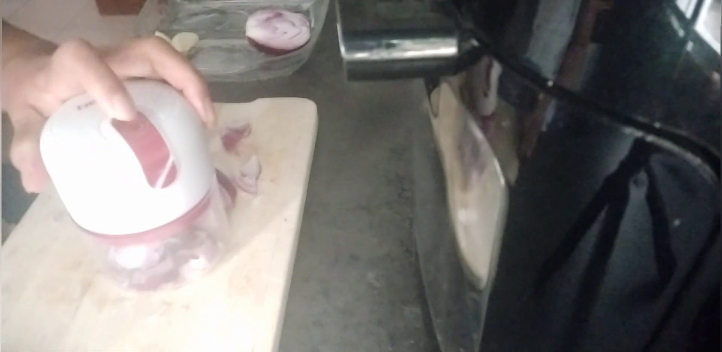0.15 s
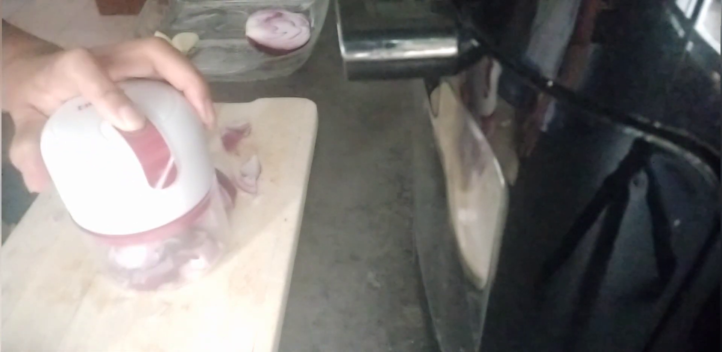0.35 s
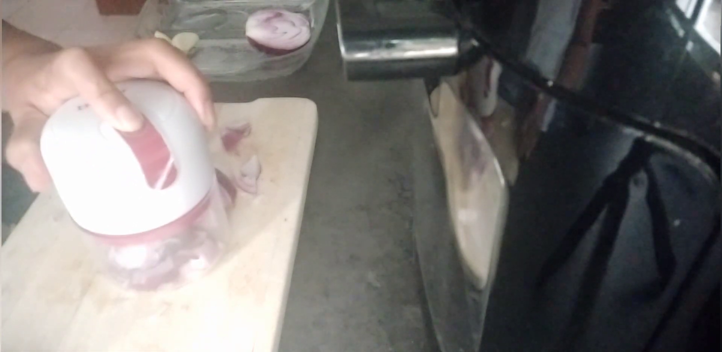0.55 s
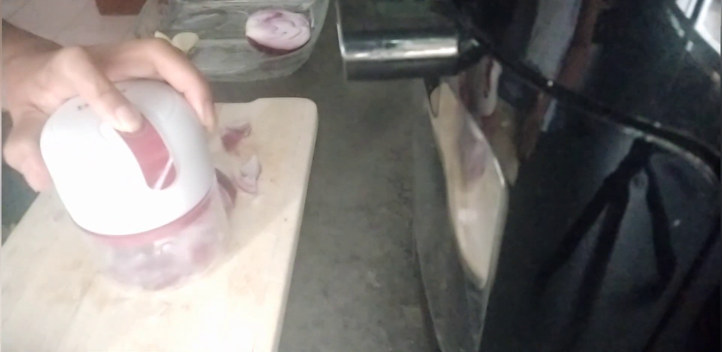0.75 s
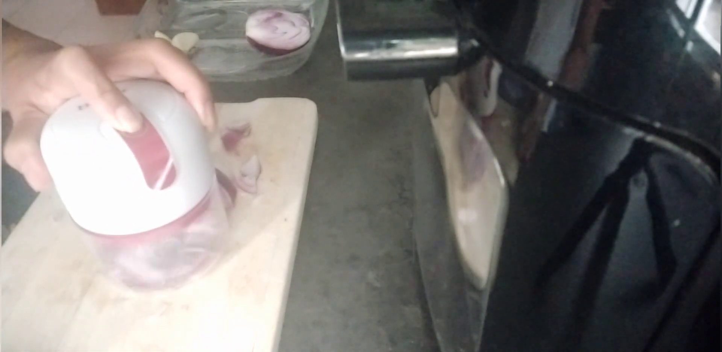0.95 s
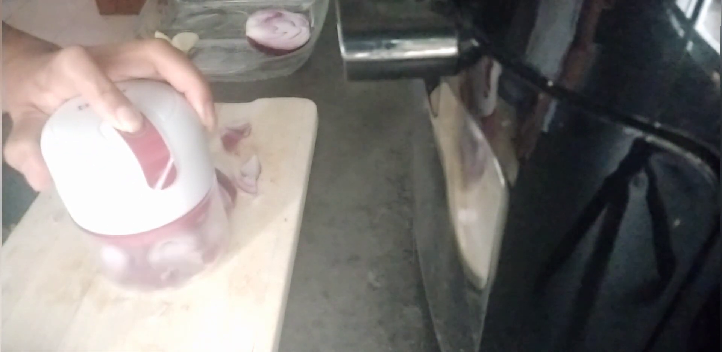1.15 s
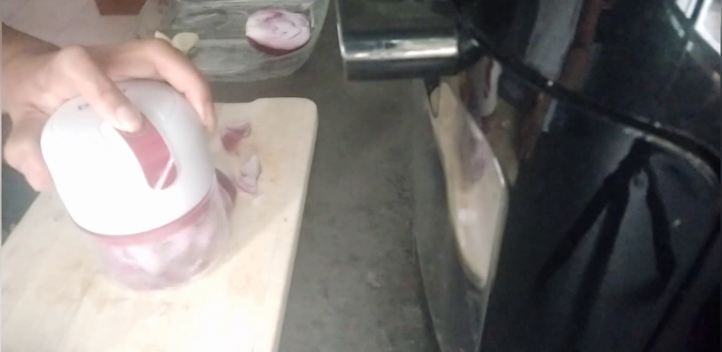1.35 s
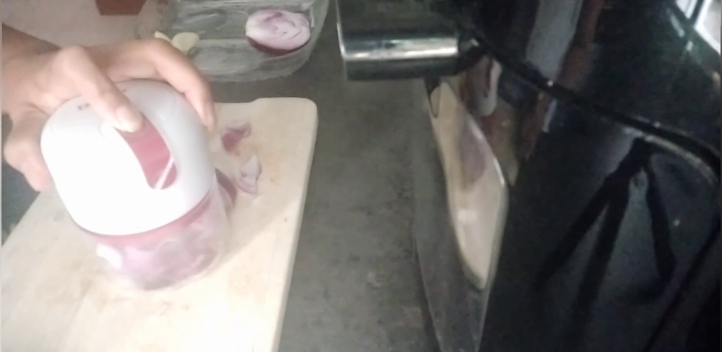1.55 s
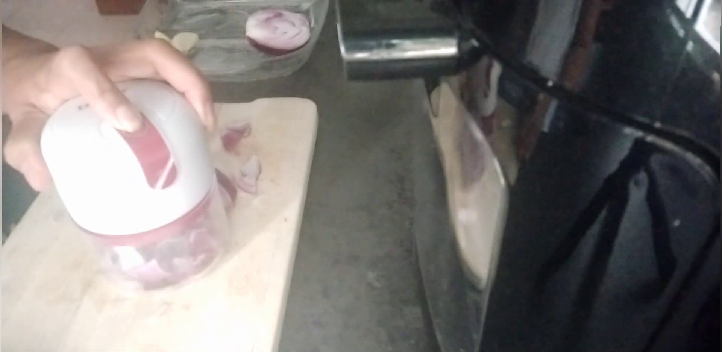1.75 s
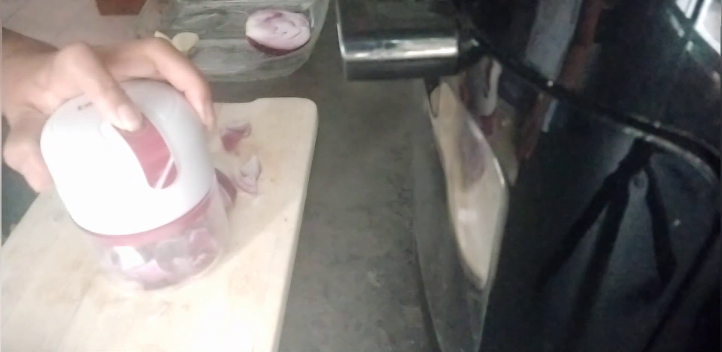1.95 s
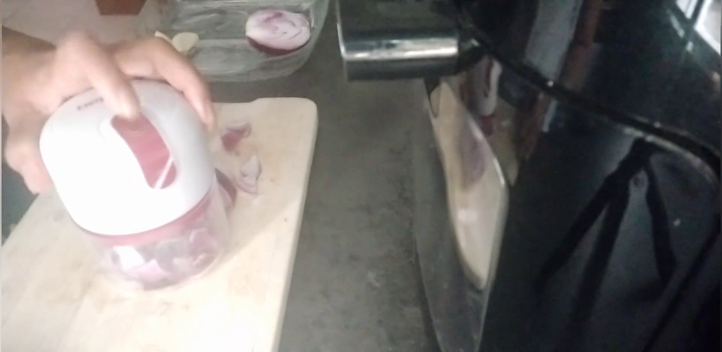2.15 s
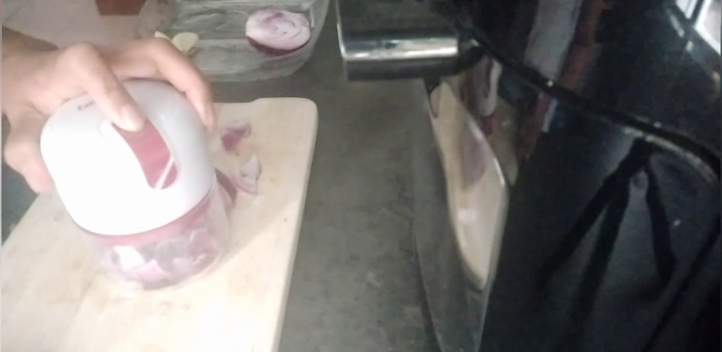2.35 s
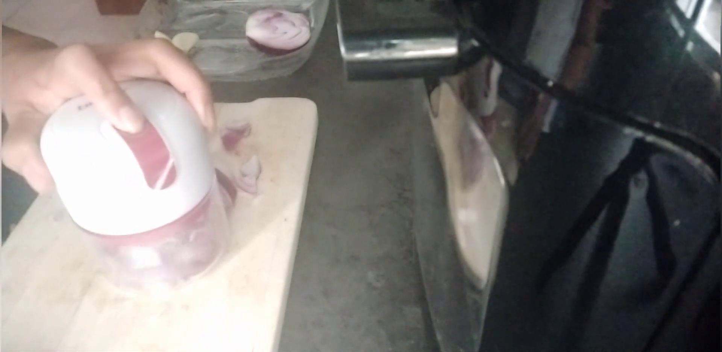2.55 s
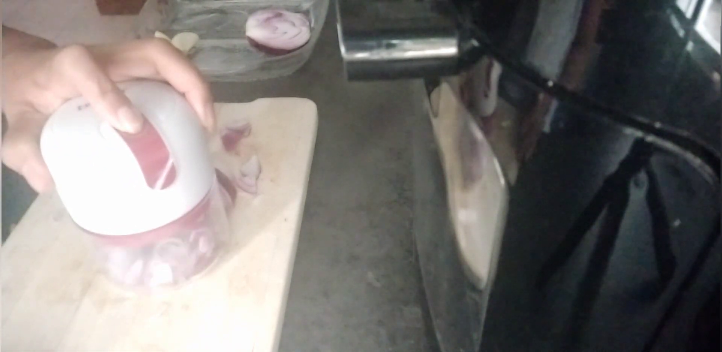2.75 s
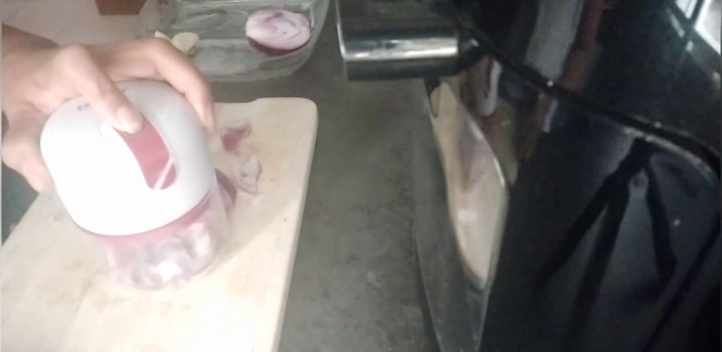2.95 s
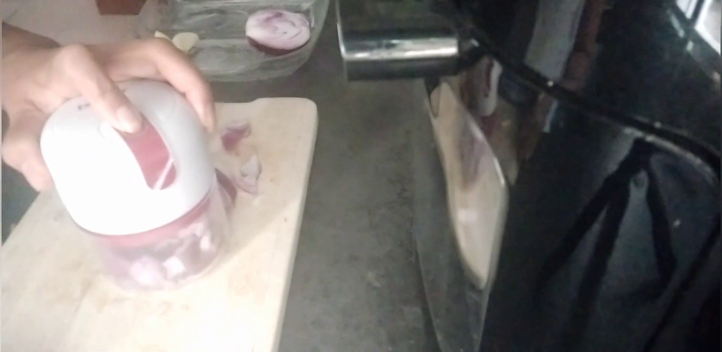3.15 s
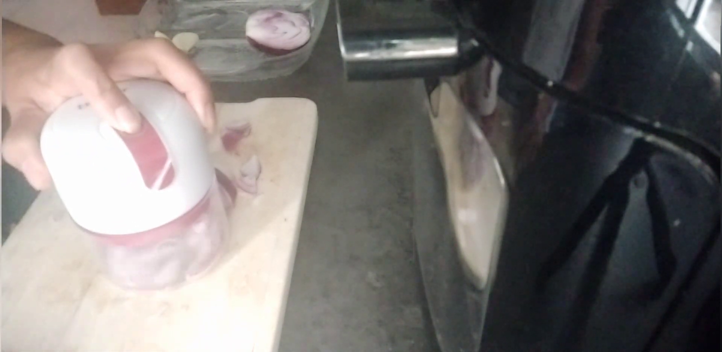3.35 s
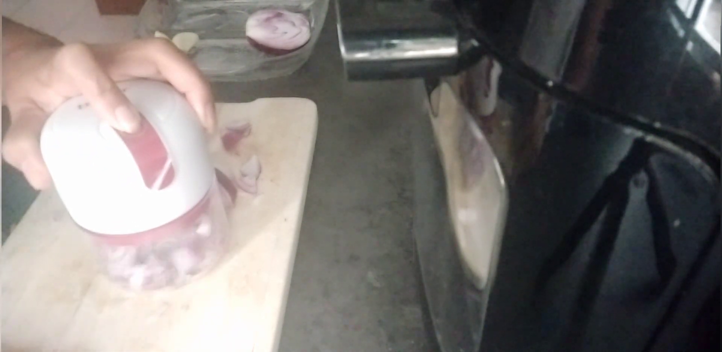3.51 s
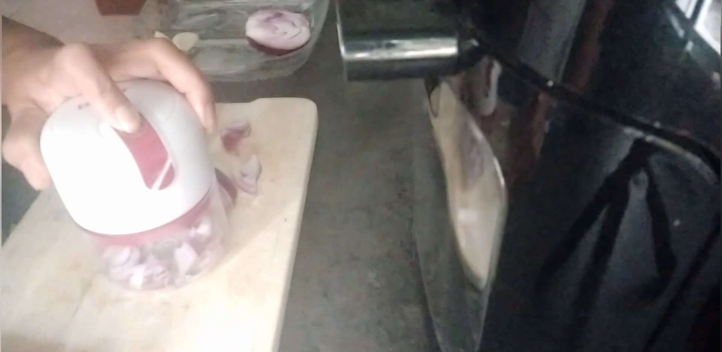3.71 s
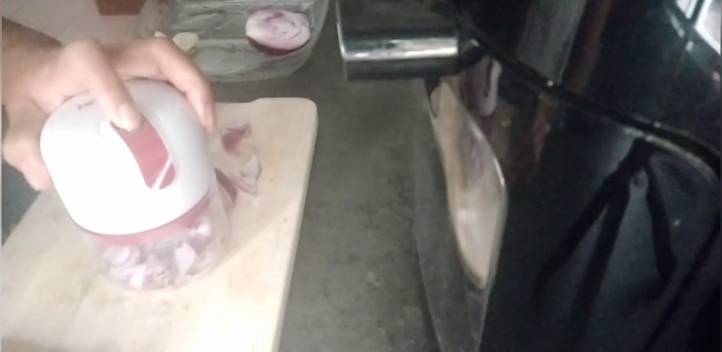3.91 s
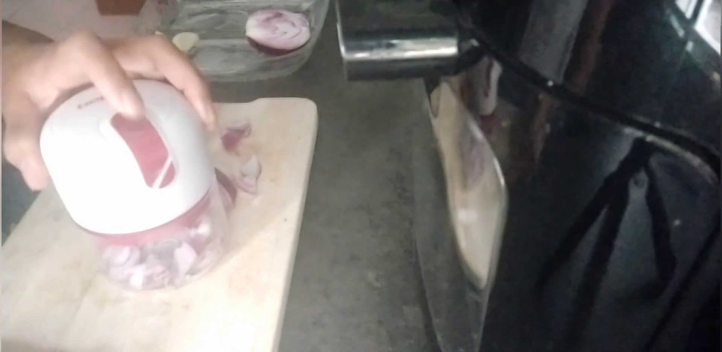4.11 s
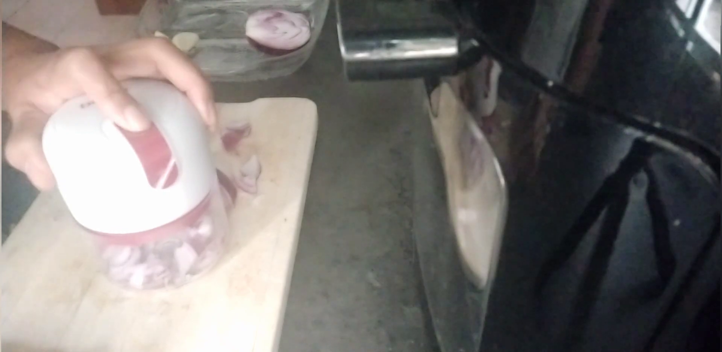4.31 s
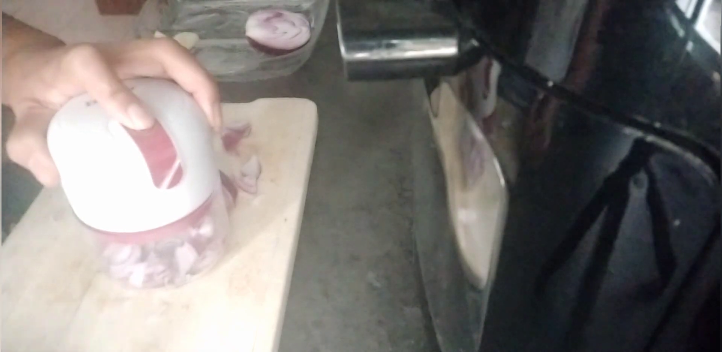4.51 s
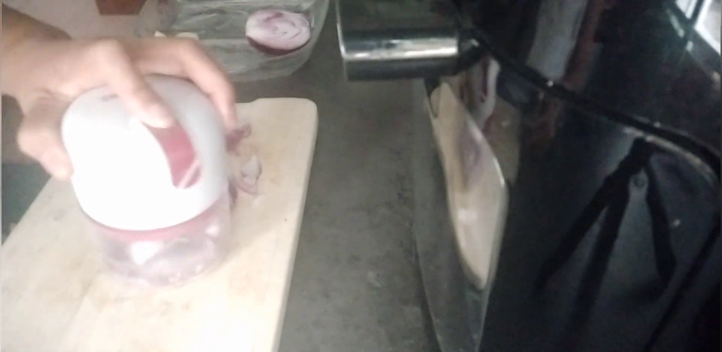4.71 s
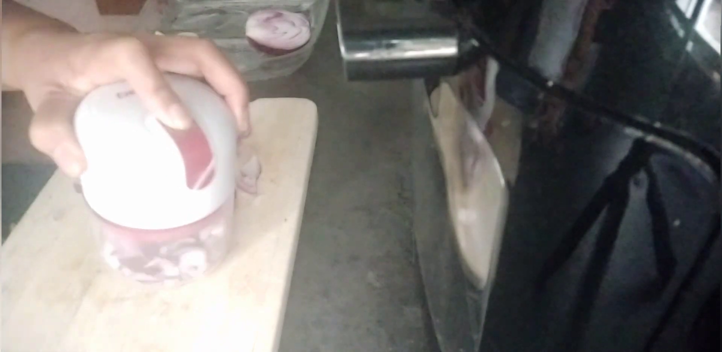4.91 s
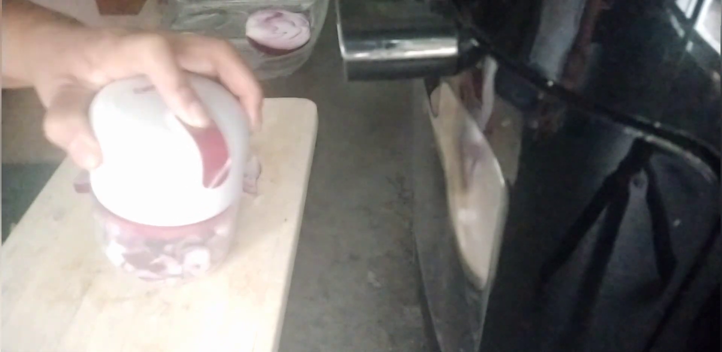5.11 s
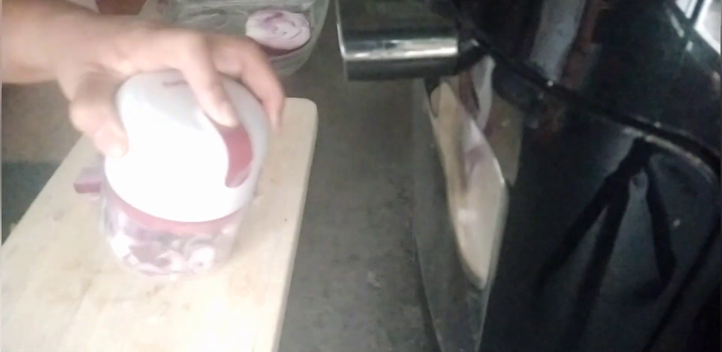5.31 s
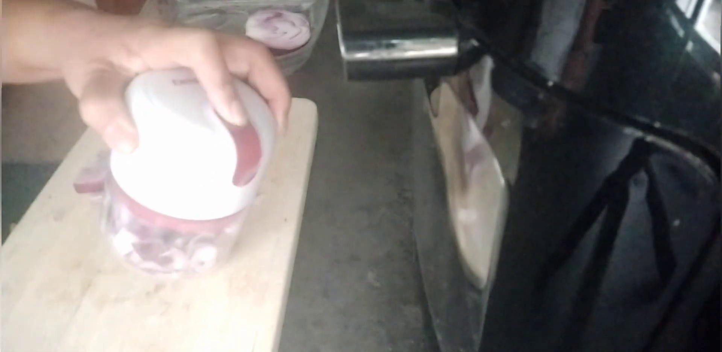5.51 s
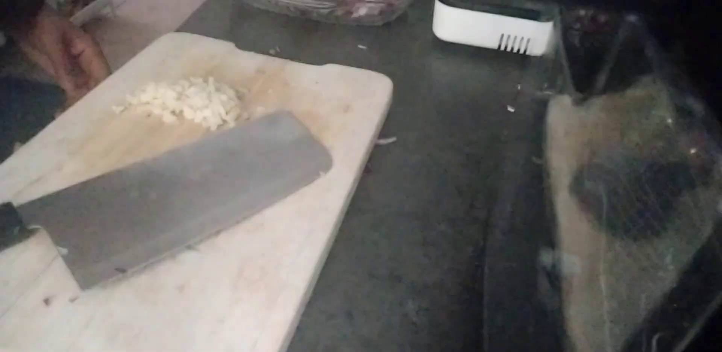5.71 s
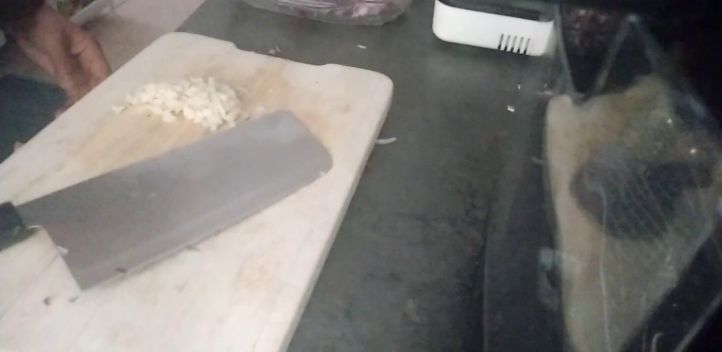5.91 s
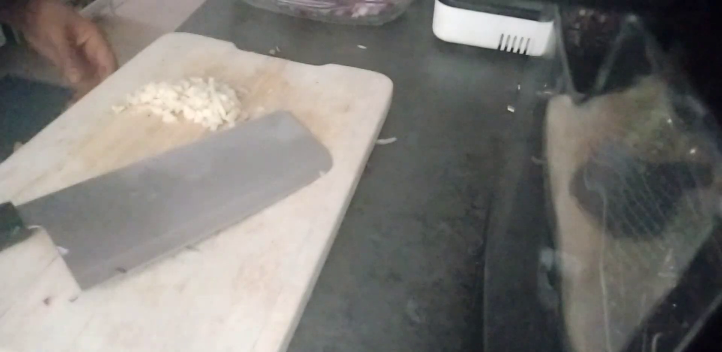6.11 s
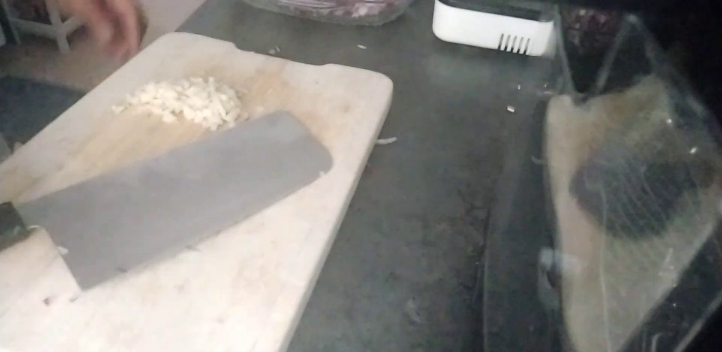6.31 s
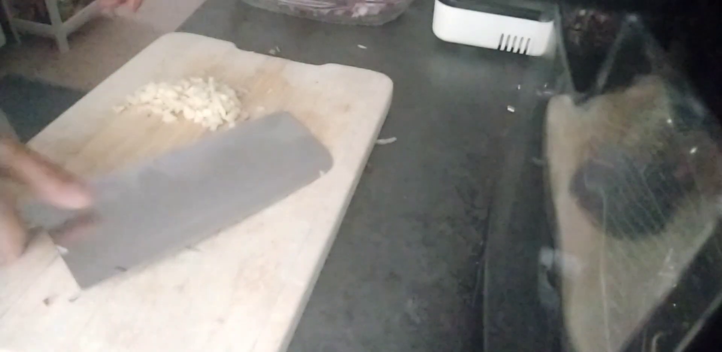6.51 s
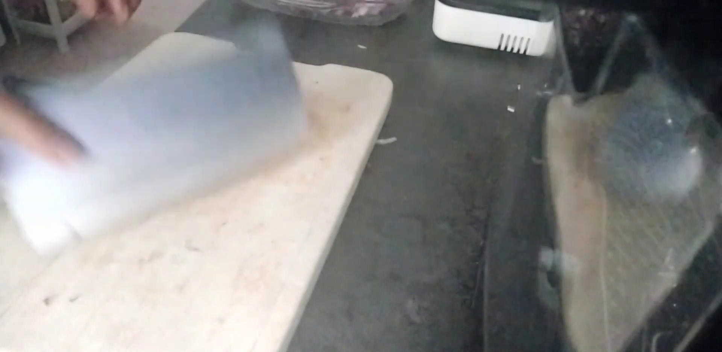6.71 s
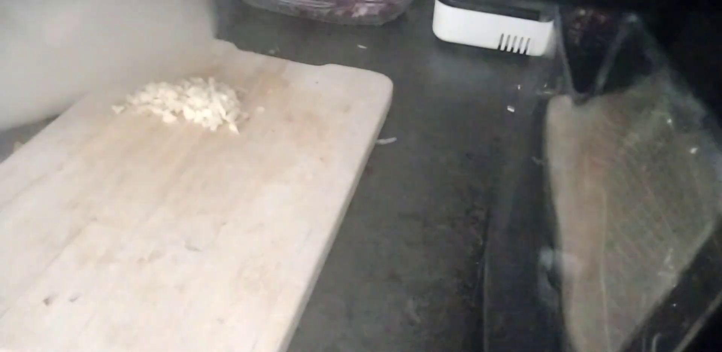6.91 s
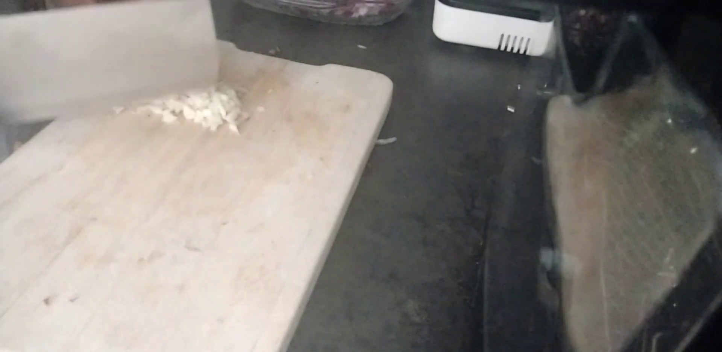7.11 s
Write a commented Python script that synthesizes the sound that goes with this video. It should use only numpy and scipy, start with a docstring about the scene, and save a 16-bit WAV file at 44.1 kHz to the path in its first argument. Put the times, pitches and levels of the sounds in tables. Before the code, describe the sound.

A small electric chopper crunches onion in three pulsing bursts on a wooden board, then after a brief dropout a steel cleaver scrapes and lifts away.

```python
"""A small chopper is pressed in three bursts on a wooden board in a kitchen: its blade sweeps through onion
about seven times a second, as dense noise grains ringing bowl resonances, with squeals, cracks and board shake.
Button and lid tick as struck modes and filtered clicks. After a short silence the sound fades in again and a
steel cleaver is lifted off the board: filtered noise and one ring. A sine hum and shaped noise fill the room."""
import sys
import numpy as np
from scipy import signal
from scipy.fft import rfft, irfft, next_fast_len
from scipy.io import wavfile

SR = 44100
rng = np.random.default_rng(int(sys.argv[2]) if len(sys.argv) > 2 else 0)


def undo_db(level):
    """Turn decibels back into plain size, where 20 dB means ten times bigger."""
    steps = np.asarray(level, float) / 20
    return 10 ** steps


def generate_wav(signal):
    """Clip the signal to [-1, 1] and save it as 16-bit WAV at the path in sys.argv[1]."""
    frames = np.transpose(np.atleast_2d(signal))
    scaled = np.clip(frames, -1, 1) * 32767
    pcm = np.round(scaled).astype(np.int16)
    wavfile.write(sys.argv[1], SR, pcm)


N = 315659

# room spectrum: hz, density_db
AIR_SPECTRUM = [(15, -54), (25, -6.5), (53, -14.5), (64, -15.5), (87, -7.5), (145, -25), (195, -13.5),
                (270, -13.5), (405, -1.5), (451, -10), (607, -18.5), (988, -33), (6210, -40), (9320, -39),
                (16000, -47.5)]
# broad humps in the room noise: hz, width_hz, relative_db
ROOM_HUMPS = [(75, 59, -5), (120.3, 6.8, -2.5), (185, 16, -10), (408.8, 8.8, -1.5), (636, 30, -19)]
# room levels: time_s, rumble_db, drone_db, hiss_db
ROOM_LEVELS = [(0, -52, -59.5, -57.5), (.5, -54.5, -62, -59), (2.3, -56, -65.5, -62.5),
               (4.0, -57, -68, -63), (4.5, -51.5, -55.5, -58), (5.3, -55.5, -64.5, -62),
               (5.69, -56.5, -63.5, -61), (6.1, -56.5, -66, -63), (7.16, -56, -64, -62.5)]
# steady sine: hz, rms_db
SINE_HUM = (81, -64)
# left-right correlation of noise: hz, correlation
CORRELATION = [(25, 1), (100, 0.96), (250, 0.83), (600, 0.32), (1500, 0.17), (16000, 0.046)]
# faint narrow hums and rustles: start_s, length_s, centre_hz, width_hz, level_db
FAINT_BANDS = [(0.0, .56, 605, 59.7, -68.5), (2.04, .13, 2000, 530, -71.5), (5.566, 0.2, 2130, 700, -71),
               (6.16, 0.03, 2960, 150, -75), (6.472, 0.044, 2600, 150, -72), (6.544, 0.054, 1800, 120, -69)]
# button and lid ticks: start_s, level_db, centre_hz
BUTTON_TICKS = [(0.577, -31.5, 2020), (1.93, -45, 1400), (2.444, -39, 1640), (3.916, -46.5, 1730),
                (4.189, -46, 1170), (4.279, -40.5, 1130), (4.586, -30.5, 2150), (5.121, -33, 1890)]
# lid modes: hz, relative_db, t60_s
LID_MODES = [(1222, -32.5, 0.013), (1700, -4.5, 0.032), (1942, 2.5, 0.087), (2260, 11, 0.01),
             (2600, -15.5, .025), (2680, -4, 0.028), (3140, -8.5, 0.073), (3950, -32, 0.045)]
# button presses: start_s, end_s, shake_start_db, shake_end_db, crunch_treble_db
BUTTON_PRESSES = [(0.634, 1.722, -51, -47, 1), (2.516, 3.59, -50.5, -53.5, 0.65),
                  (4.68, 4.94, -48, -51, -2)]
# knocks on the board: start_s, level_db, contact_s
BOARD_KNOCKS = [(.72, -35, 0.0038), (1.14, -41.5, 0.0032), (1.41, -36, 0.0041), (1.555, -37.5, .005),
                (2.99, -39, 0.0062), (3.135, -39.5, 0.0037), (4.187, -48, 0.0034), (4.286, -31, 0.0047),
                (4.865, -37.5, 0.009), (6.507, -41, 0.0012), (6.522, -36.5, 0.002), (6.545, -42.5, 0.0019),
                (6.59, -38, 0.0086), (6.648, -30.5, 0.0049), (6.7, -35, 0.0087), (6.765, -40.5, 0.0025)]
# board modes: hz, relative_db, t60_s
BOARD_MODES = [(58.4, -30, .2), (78.4, -3, 0.074), (99.6, -1, 0.27), (192, -9.5, 0.046), (308, 2, 0.044),
               (470, -5.5, 0.048), (790, -24, 0.06)]
# blade sweeps: start_s, level_db, fade_start_s (after start), nominal_t60_s, squeal_db
BLADE_SWEEPS = [(0.647, -38, 0.064, 1, -55), (0.791, -34, 0.052, 0.34, -46.5),
                (0.913, -32.5, 0.044, 0.68, -42.5), (1.048, -34, 0.092, 0.3, -43.5),
                (1.182, -35.5, 0.075, 0.67, -44), (1.314, -33.5, 0.051, 0.66, -43.5),
                (1.454, -33.5, 0.032, 0.43, -43), (1.585, -36.5, 0.071, 0.27, -41),
                (2.526, -38, 0.081, 0.15, -50), (2.653, -39, 0.069, 0.24, -53),
                (2.799, -38, 0.055, 0.21, -49.5), (2.931, -40, 0.043, 0.2, -60),
                (3.069, -36, 0.03, 0.42, -49.5), (3.203, -37, 0.031, 0.6, -45.5),
                (3.34, -36, 0.045, 0.51, -39), (3.481, -35, 0.047, 0.19, -49),
                (4.667, -39.5, 0.072, 0.42, -40), (4.793, -37, 0.1, 0.28, -38)]
# plastic bowl modes: hz, width_hz, relative_db
BOWL_MODES = [(745.2, 46, 1), (1140, 235, 1), (2053, 830, -4.5), (2890, 590, 2), (4470, 35, -2.5),
              (5070, 43, 5.5), (5830, 38, -17.5), (6400, 83, 5), (7300, 20, -12), (7150, 160, -26)]
# crunch spectrum: hz, density_db
CRUNCH_SPECTRUM = [(82, -37), (140, 0.5), (225, -14), (286, 1), (595, -1.5), (740, -5.5), (903, -10.5),
                   (1120, 0), (1400, -11.5), (1800, -4), (2400, -5), (3300, -0.5), (4160, -2), (10300, -10),
                   (16000, -15)]
# hollows in the crunch spectrum: hz, width_hz
SPECTRAL_HOLLOWS = [(4200, 2400), (5250, 190), (7700, 520), (11400, 300)]
# pieces cracking under the blade or thrown at the bowl: start_s, level_db, centre_hz
PIECE_CRACKS = [(0.691, -25, 1480), (0.699, -31, 587), (0.739, -30, 2720), (.83, -28, 2570),
                (0.948, -24, 2780), (.951, -32, 690), (1.129, -30.5, 700), (1.214, -17.5, 3090),
                (1.339, -19, 2500), (1.361, -29.5, 442), (1.499, -27, 750), (1.631, -24, 2880),
                (2.593, -16, 3150), (2.845, -35, 775), (2.948, -26.5, 2540), (3.089, -26.5, 1760),
                (3.226, -31, 2610), (3.364, -27, 2900), (3.42, -32.5, 540), (4.707, -23, 2600),
                (4.798, -24, 1910), (4.838, -15, 2480), (4.893, -25.5, 2600)]
# small dry snaps: start_s, level_db, centre_hz, spread_ratio
DRY_SNAPS = [(2.1, -40.5, 6400, 1.54), (2.26, -53, 7000, 2.2), (3.863, -45.5, 1790, 4.5),
             (4.212, -45, 8000, 3), (4.279, -42.5, 4640, 1.56), (5.412, -44, 3770, 2.6),
             (6.504, -45, 1500, 4), (6.526, -32, 2930, 2.44), (6.766, -29, 2400, 4.3)]
# cleaver sliding and lifting: time_s, steel_rub_db, wood_scrape_db
CLEAVER_SLIDE = [(6.48, -69, -89), (6.512, -65, -49), (6.53, -70, -51), (6.57, -64, -61.5),
                 (6.705, -60.5, -54.5), (6.725, -51, -63), (6.77, -49, -52.5), (6.856, -78, -71),
                 (6.894, -61, -72), (7.0, -73.5, -71)]
# cleaver modes: hz, relative_db, t60_s
STEEL_MODES = [(4800, 0, .2), (6430, -14, .15), (7700, -12, .15), (8000, -10, .15), (9400, -14, .15),
               (10630, -15, .15)]


def rms_one(x):
    """Scale to rms 1."""
    return x / np.sqrt(np.mean(x ** 2) + 1e-20)


def in_time(rows, outside=None):
    """Straight lines between timed rows, one curve per column."""
    time_s, *columns = np.transpose(rows)
    return [np.interp(np.arange(N) / SR, time_s, c, outside, outside) for c in columns]


def at_hz(points, hz):
    """Interpolate a (hz, value) table over log frequency."""
    table_hz, values = np.array(points).T
    return np.interp(np.log(hz + 1), np.log(table_hz + 1), values)


def shaped(x, spectrum):
    """Colour by a spectrum in dB per Hz; rms 1."""
    size = next_fast_len(N)
    hz = np.arange(size // 2 + 1) * SR / size
    coloured = irfft(rfft(x, size) * undo_db(at_hz(spectrum, hz)), size)
    return rms_one(coloured[..., :N])


def cut(x, hz, kind):
    """Second-order Butterworth filter."""
    sos = signal.butter(2, np.clip(hz, 10, .45 * SR), kind, fs=SR, output="sos")
    return signal.sosfilt(sos, x)


def drift(rate_hz):
    """Random line through knots of spread 1, rate_hz knots a second (at most 399)."""
    knots = rng.standard_normal(int(N / SR * 400) + 2)
    return np.interp(np.arange(N) / SR * min(rate_hz, 399), np.arange(len(knots)), knots)


def resonate(x, hz, width_hz):
    """Two-pole resonance, gain about 1 at its peak."""
    r = np.exp(-np.pi * width_hz / SR)
    poles = [1, -2 * r * np.cos(2 * np.pi * hz / SR), r * r]
    return signal.lfilter([(1 - r * r) / 2, 0, (r * r - 1) / 2], poles, x)


def struck(hits, modes, scatter_db):
    """Each hit (start_s, level_db, contact_s) is a rounded push ringing all modes with scattered strengths."""
    out = np.zeros(N)
    scatter = rng.standard_normal((len(hits), len(modes)))
    for k, (hz, mode_db, t60_s) in enumerate(modes):
        force = np.full(N, 1e-18)
        for (start_s, hit_db, contact_s), luck in zip(hits, scatter[:, k]):
            push = np.hanning(max(round(contact_s * SR), 1) + 2)[1:-1]
            i = round(start_s * SR)
            force[i:i + len(push)] += undo_db(hit_db + mode_db + scatter_db * luck) * push / push.sum()
        r, w = undo_db(-60 / (t60_s * SR)), 2 * np.pi * hz / SR
        out += signal.lfilter([0, np.sin(w)], [1, -2 * r * np.cos(w), r * r], force)
    return out


def snap(rows, click=4):
    """Band-passed click and noise burst with a weaker rustle dying behind."""
    out, t = np.zeros(N), np.arange(round(.2 * SR)) / SR
    noise = rng.standard_normal((len(rows), len(t)))
    for (start_s, peak_db, hz, rustle_t60_s, spread), n in zip(rows, noise):
        band_hz = [hz / spread, hz * spread]
        burst_gain = undo_db(-60 * t / .016)
        rustle_gain = undo_db(-14 - 60 * t / max(rustle_t60_s, .01))
        force = click * (t == 0) + n * (burst_gain + rustle_gain)
        burst = cut(cut(force, band_hz, "band"), band_hz, "band")
        i = round(start_s * SR)
        out[i:i + len(t)] += (undo_db(peak_db) * burst / np.abs(burst).max())[:N - i]
    return out


def stereo_noise():
    """White noise, alike left and right in the bass, nearly unrelated in the treble."""
    size = next_fast_len(N)
    mid, side = rfft(rng.standard_normal((2, size)))
    alike = np.clip(at_hz(CORRELATION, np.arange(len(mid)) * SR / size), 0, 1)
    sides = np.sqrt(1 + alike) * mid + np.sqrt(1 - alike) * side * [[1], [-1]]
    return irfft(sides, size)[:, :N]


def room_tone():
    """A sine hum of drifting level under rumble, drone and hiss cut from one humped noise."""
    other = stereo_noise()
    humps = sum(undo_db(db + 5.0) * resonate(other, hz, width_hz) for hz, width_hz, db in ROOM_HUMPS)
    air = shaped(stereo_noise() + humps, AIR_SPECTRUM)
    rumble_db, drone_db, hiss_db = in_time(ROOM_LEVELS)
    hum_hz, hum_db = SINE_HUM
    hum = np.sqrt(2) * undo_db(hum_db + drift(6.1)) * np.sin(2 * np.pi * hum_hz * np.arange(N) / SR)
    rumble = undo_db(rumble_db) * rms_one(cut(air, 159, "low"))
    drone = undo_db(drone_db) * rms_one(cut(air, [150, 900], "band"))
    hiss = undo_db(hiss_db) * rms_one(cut(air, 626, "high"))
    return hum + rumble + drone + hiss


def faint():
    """Noise twice through a narrow resonance, swelling and fading."""
    noise, out = stereo_noise(), np.zeros((2, N))
    for start_s, length_s, hz, width_hz, db in FAINT_BANDS:
        part = slice(round(start_s * SR), round((start_s + length_s) * SR))
        band = rms_one(resonate(resonate(noise[:, part], hz, width_hz), hz, width_hz))
        swell = np.abs(np.sin(np.pi * np.linspace(0, 1, band.shape[1]))) ** .5
        out[:, part] += undo_db(db) * band * swell
    return out


def kitchen(x, t60_s, wet_db):
    """Dense echoes, different on each side, the treble dying sooner."""
    t = np.arange(round(.6 * SR)) / SR
    noise = stereo_noise()[:, :len(t)]
    dull = cut(noise, 4000, "low")
    tail = dull * undo_db(-60 * t / t60_s) + (noise - dull) * undo_db(-60 * t / (t60_s * 0.81))
    tail = tail * np.clip(t / 0.0026 - .3, 0, 1)  # short gap, then onset
    tail = tail / np.sqrt(np.sum(tail ** 2, axis=1, keepdims=True))
    return x + undo_db(wet_db) * signal.fftconvolve(x, tail, axes=1)[:, :N]


def ticks():
    """Plastic click and bounce: a dry snap over short lid modes, with shorter contact for higher ticks."""
    bounce_s, bounce_db = .012, -15
    both = BUTTON_TICKS + [(s + bounce_s, db + bounce_db, hz) for s, db, hz in BUTTON_TICKS]
    hits = [(s, db - 17, 0.28 / hz) for s, db, hz in both]
    lid = struck(hits, LID_MODES, scatter_db=1.5)
    return lid + snap([(s, db, hz, .06, 1.8) for s, db, hz in both], click=12)


def shake():
    """Uneven board-shake level from the unbalanced blade while the button is held."""
    rise_s, fall_s, wander_db = 0.041, 0.088, 1.5
    level = 0
    for start_s, end_s, first_db, last_db, _ in BUTTON_PRESSES:
        points = [(start_s, -70), (start_s + rise_s, first_db), (end_s, last_db), (end_s + fall_s, -66)]
        level = level + undo_db(in_time(points, outside=-120)[0])
    return level * undo_db(wander_db * drift(20))


def board():
    """Knocks ring all board modes; the shaking chopper drives two low ones with noise."""
    knocks = struck(BOARD_KNOCKS, BOARD_MODES, scatter_db=1.5)
    rumble = rms_one(sum(undo_db(db) * resonate(rng.standard_normal(N), hz, 6.5)
                         for hz, db, _ in BOARD_MODES[1:3]))
    return shake() * rumble + knocks


def sweeps():
    """Gains of middle, bass and treble: each sweep swells, holds and fades, the treble fastest."""
    rise_s, bass_db = 0.024, -0.5
    power, t = np.zeros((3, N)), np.arange(round(.6 * SR)) / SR
    fade_speed = np.array([[1.05], [.9], [1.7]])
    for start_s, db, held_s, t60_s, _ in BLADE_SWEEPS:
        treble_db = [press[-1] for press in BUTTON_PRESSES if start_s < press[1]][0]
        fading = np.maximum(t - held_s, 0) / max(t60_s, .03) * fade_speed
        band_db = db + np.array([[0], [bass_db], [treble_db]])
        swell = np.clip(t / rise_s, 0, 1) * undo_db(band_db - 60 * fading)
        i = round(start_s * SR)
        power[:, i:i + len(t)] += swell ** 2
    return np.sqrt(power)


def clumped(x, patchy_db):
    """Pieces arrive in clumps: quarter-octave bands flicker partly together, partly alone."""
    edges_hz, together = 200 * 2 ** np.arange(0, 6.6, .25), drift(60)
    out = 0
    for low_hz, high_hz in zip(edges_hz, edges_hz[1:]):
        sos = signal.butter(1, [low_hz, high_hz], "band", fs=SR, output="sos")
        flicker = 0.61 * together + 1.14 * drift(35) + 1.16 * drift(8)
        out = out + signal.sosfilt(sos, x) * undo_db(patchy_db * flicker)
    return out


def housing(x, t60_s):
    """Sound leaves through dense short modes, different on each side; spectral hollows are then subtracted."""
    t = np.arange(round(.04 * SR)) / SR
    modes = cut(stereo_noise()[:, :len(t)], 1500, "high") * undo_db(-60 * t / t60_s)
    modes = modes / np.sqrt(np.sum(modes ** 2, axis=1, keepdims=True))
    x = x + undo_db(-1.0) * signal.fftconvolve(x, modes, axes=1)[:, :N]
    for hz, width_hz in SPECTRAL_HOLLOWS:
        x = x - 0.52 * resonate(x, hz, width_hz)
    return x


def blade():
    """Dense cell-bursting grains and sparse rattling pieces ring the plastic bowl."""
    grains_per_s, pieces_per_s = 9000, 120
    sizes = np.minimum(rng.exponential(1, (3, N)), 5)
    grains = undo_db(3.7 * sizes) * rng.choice([-1, 1], (3, N)) * (rng.random((3, N)) < grains_per_s / SR)
    shared, own = grains[0], grains[1:]  # own: one row per side
    grains = shared * 0.88 + cut(own, 400, "high") + 0.94 * cut(own, 400, "low")
    rattle, ringing = rng.random(N) < pieces_per_s / SR, 0
    for k, (hz, width_hz, db) in enumerate(BOWL_MODES):
        pieces = rattle * rng.standard_normal(N) * undo_db(15.5)  # each mode is struck differently
        ringing = ringing + (-1) ** k * undo_db(db) * resonate(grains + pieces, hz, width_hz)
    patchy = clumped(grains + undo_db(4) * ringing, patchy_db=3.5)
    crunch = shaped(housing(patchy, t60_s=0.029), CRUNCH_SPECTRUM)
    low, high = cut(crunch, 1600, "low"), cut(crunch, 4300, "high")
    middle_gain, bass_gain, treble_gain = sweeps()
    return middle_gain * (crunch - low - high) + bass_gain * low + treble_gain * high


def squeals():
    """Blade scrapes the bowl: a rough narrow band rises and falls in pitch, higher for a harder scrape."""
    lag_s, length_s, top_hz, hz_per_db = 0.012, .08, 2785, 21.5
    out, u = np.zeros((2, N)), np.linspace(0, 1, round(length_s * SR))
    mean_db = np.mean([row[-1] for row in BLADE_SWEEPS])
    for start_s, *_, db in BLADE_SWEEPS:
        pitch_hz = (top_hz + hz_per_db * (db - mean_db)) * (1 - 0.52 * (2 * u - .9) ** 2)
        rough = cut(rng.standard_normal((2, 2, round(.2 * SR))), 210, "low")[..., :len(u)]
        carrier = np.exp(2j * np.pi * np.cumsum(pitch_hz) / SR)
        band = ((rough[0] + 1j * rough[1]) * carrier).real
        i = round((start_s + lag_s) * SR)
        out[:, i:i + len(u)] += undo_db(db) * rms_one(band) * np.sin(np.pi * u) ** .5
    return out


def cracks():
    """Pieces crack or hit the bowl as broad clicks with a short rustle."""
    return snap([(s, db, hz, .04, 2.82) for s, db, hz in PIECE_CRACKS])


def snaps():
    """Small dry clicks, each with its own bandwidth and a longer rustle."""
    return snap([(s, db, hz, 0.083, spread) for s, db, hz, spread in DRY_SNAPS])


def dropout():
    """Gain of a short silence, a low return and a fade back to full level."""
    drop_s, silent_s, return_db, recover_s = 5.7, .039, -12.5, 0.25
    back_s = drop_s + silent_s
    points = [(drop_s, 0), (drop_s + .003, -80), (back_s, -80),
              (back_s + 0.0079, return_db), (back_s + recover_s, 0)]
    return undo_db(in_time(points)[0])


def cleaver():
    """Steel hisses over wood, the wood grumbles below, and the blade rings once as it leaves."""
    noise, (rub_db, scrape_db) = stereo_noise(), in_time(CLEAVER_SLIDE, outside=-120)
    rub = rms_one(cut(noise, 1500, "high")) * undo_db(3.56 * drift(90))
    wood = resonate(noise, 240, 110) + 0.36 * cut(noise, [150, 800], "band")
    scrape = rms_one(wood) * undo_db(2 * drift(60))
    ring = struck([(6.767, -41.5, 0)], STEEL_MODES, scatter_db=0)  # start_s, level_db, contact_s
    return undo_db(rub_db) * rub + undo_db(scrape_db) * scrape + ring


def scene():
    """Near sources sound in the kitchen, slightly left; board, slightly right, and room tone join."""
    clicks = [cracks(), snaps()]
    near = undo_db(0.5) * (blade() + squeals() + clicks[0] + ticks() + clicks[1] + faint()) + cleaver()
    near = near * undo_db([[.4], [-.4]])
    whole = kitchen(near, t60_s=0.37, wet_db=-7) + board() * undo_db([[.4], [1.6]]) + room_tone()
    whole[1] = np.roll(whole[1], 4)  # left leads by 4 samples
    return whole


def top_cut(x):
    """Nothing passes above the cut-off."""
    return signal.sosfilt(signal.butter(12, 16460, fs=SR, output="sos"), x)


def record(dry):
    """The deepest bass is filtered off, a band limit removes the very top; the sound drops out once."""
    no_bass = cut(cut(dry, 53, "high"), 53, "high")
    band_limit = signal.cheby2(12, 60, 16450, fs=SR, output="sos")
    mix = signal.sosfilt(band_limit, no_bass) * dropout()
    return top_cut(mix)


dry = scene()
out = record(dry)
generate_wav(out)
```